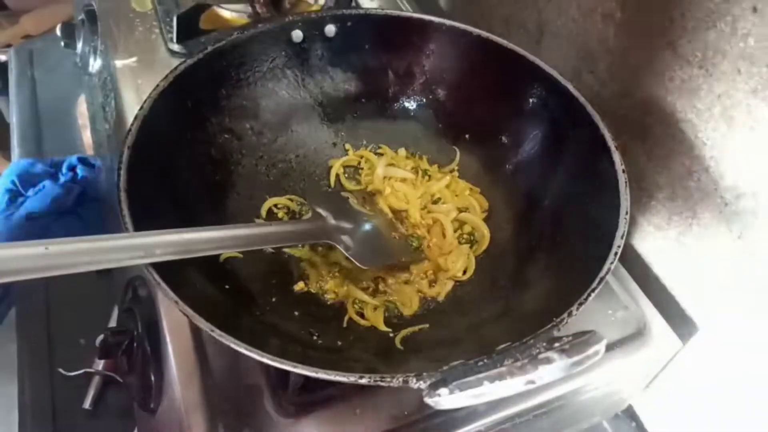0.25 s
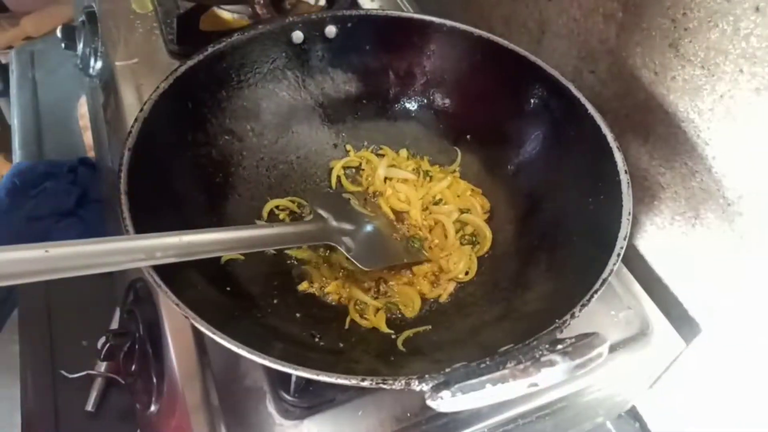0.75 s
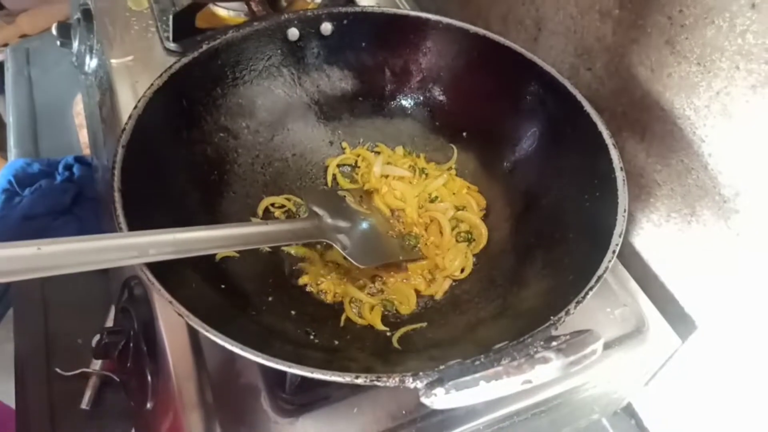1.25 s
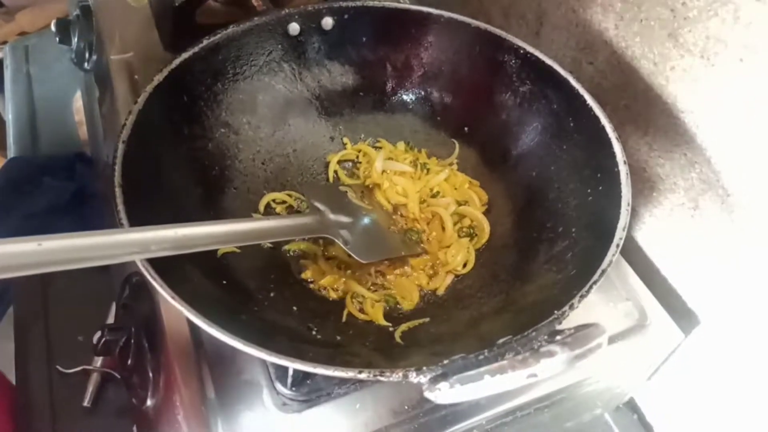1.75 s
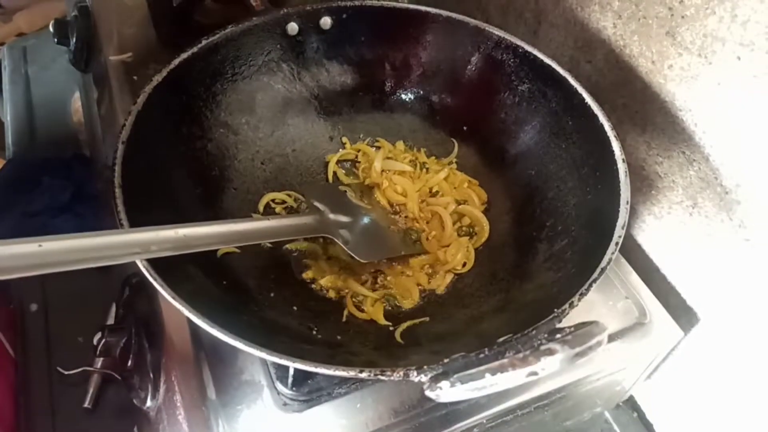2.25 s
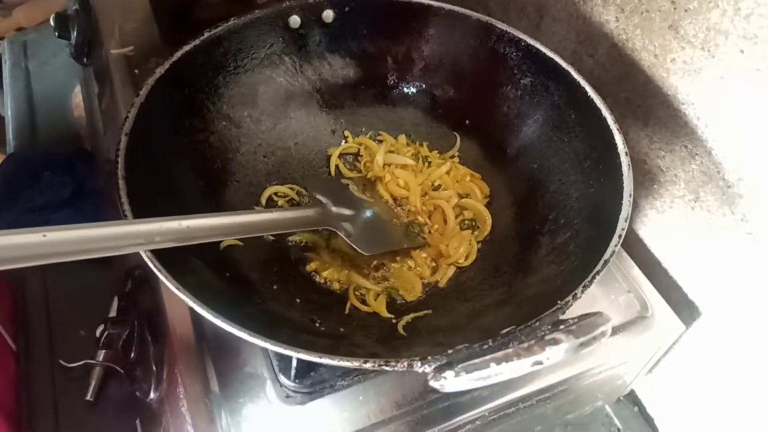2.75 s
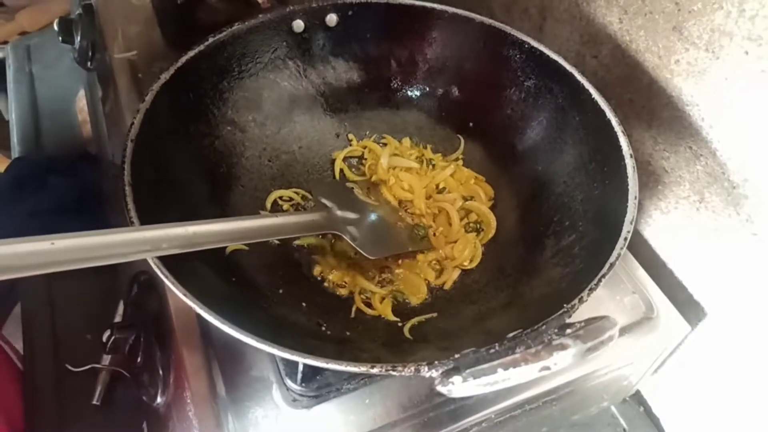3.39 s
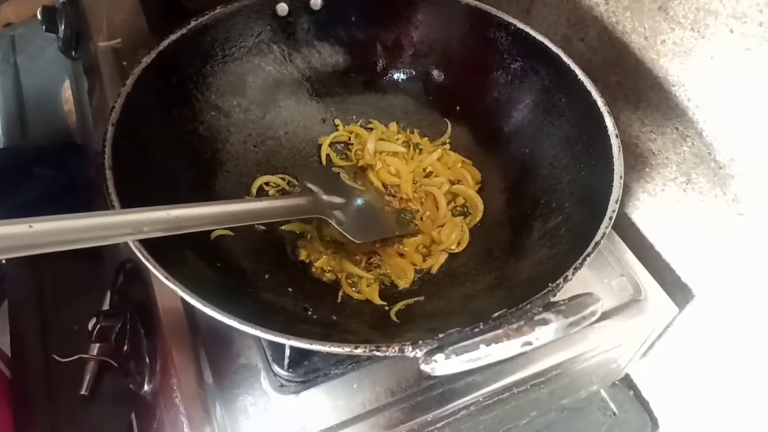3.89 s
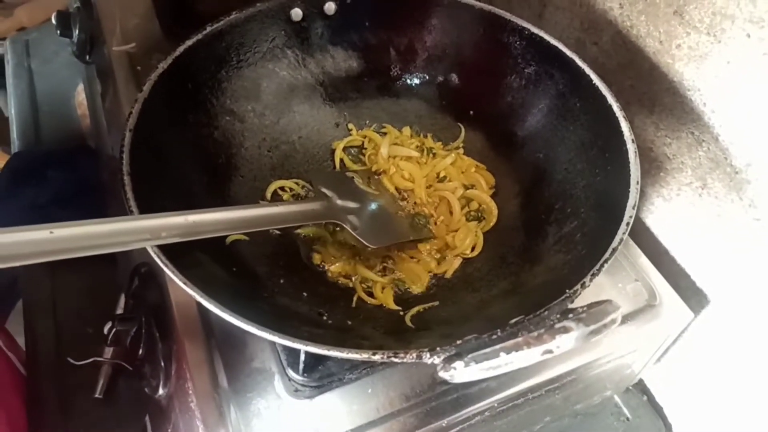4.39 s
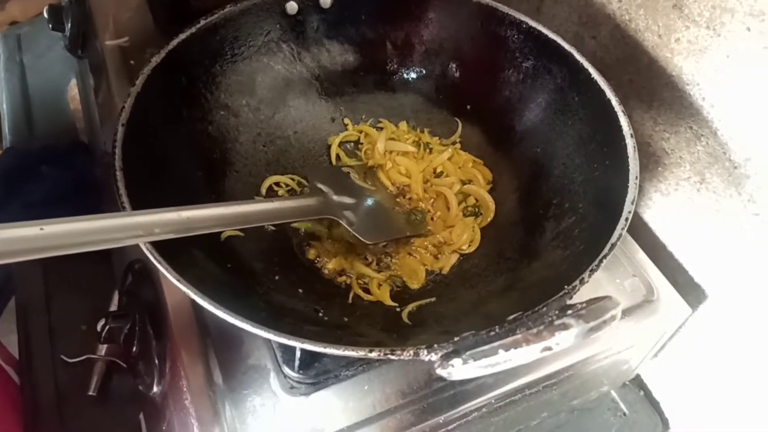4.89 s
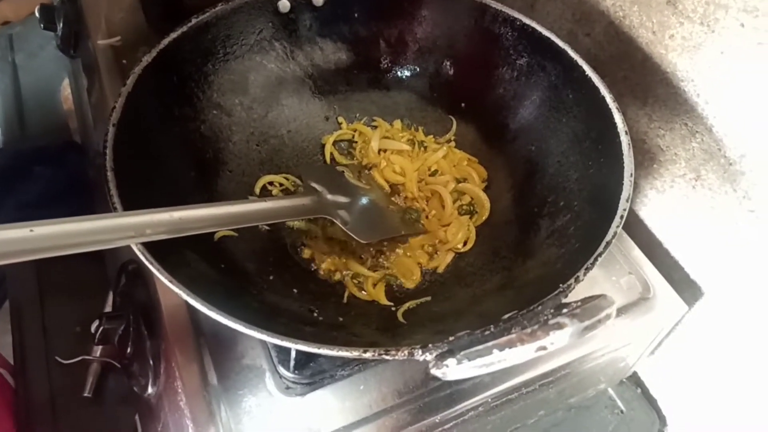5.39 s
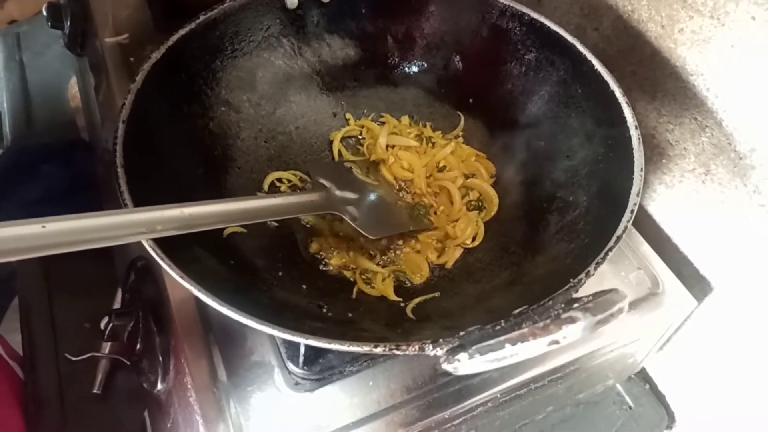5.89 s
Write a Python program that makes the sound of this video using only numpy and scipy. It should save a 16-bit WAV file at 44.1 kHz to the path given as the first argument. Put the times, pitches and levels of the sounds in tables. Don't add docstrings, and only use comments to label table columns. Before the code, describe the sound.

A steady, fine-grained sizzle of onions frying in oil runs throughout about six seconds, steam hiss mixed with tiny bursting bubbles, above a low burner and room rumble and a faint wavering fan hum. Around 0.1 s handling swells the rumble briefly, with a gritty steel click and small fat spits; soft dull spatula knocks follow at 0.3-0.4 s, and sharp spits at 0.5, 0.6 and, loudest, 0.83 s. At 1.05-1.18 s the spatula skids, lands hard with a dull mid-pitched metallic clank and bounces two or three times, dying fast. Light touches and tiny crackles come near 2 s, a dry click at 2.3, soft taps around 3, 3.9 and 4.1, a spit near 4.5. Bright blade ticks with short pan rings sound at 4.8, 5.1 and 5.9 s, a fainter one at 5.5. Close phone microphone, mono-like, with softened treble.

```python
import sys
import numpy as np
from scipy import signal
from scipy.fft import rfft, irfft
from scipy.io import wavfile
from scipy.ndimage import uniform_filter1d, minimum_filter1d

SR = 44100
rng = np.random.default_rng(int(sys.argv[2]) if len(sys.argv) > 2 else 0)


def nominal_scale(level):
    x = np.asarray(level, float) / 20
    return 10 ** x


def persist_wave(psi):
    counts = np.round(np.clip(psi, -1, 1) * 32767).astype(np.int16)
    wavfile.write(sys.argv[1], SR, np.atleast_2d(counts).T)


N = 270721


def evened(x):
    return x / np.sqrt(np.mean(x ** 2) + 1e-20)


def read(points, hz):
    f, value = np.transpose(points)
    return np.interp(np.log(hz + 1), np.log(f + 1), value)


def colour(x, points):
    hz = np.fft.rfftfreq(x.shape[-1], 1 / SR)
    return irfft(rfft(x) * nominal_scale(read(points, hz)), x.shape[-1])


def band(x, lo_hz, hi_hz):
    return signal.sosfilt(signal.butter(2, [lo_hz, hi_hz], "bandpass", fs=SR, output="sos"), x)


def add(mix, s, sound):
    part = mix[round(s * SR):][:len(sound)]
    part += sound[:len(part)]


# time in seconds, change in dB.
STIR = [
    (0.0, -5),
    (.12, 11),
    (.24, 2.5),
    (.8, .3),
    (1.25, 2),
    (1.4, 0.7),
    (3.88, -0.4),
    (4.02, 0.5),
    (4.99, -1.5),
    (6.14, -0.1),
]


def level(base_db, share):
    s, db = np.transpose(STIR)
    return nominal_scale(base_db + share * np.interp(np.arange(N) / SR, s, db))


def patchy(points, patchy_db, flicker_db):
    frames = N // 128 + 5
    a, b, patches = rng.standard_normal((frames, 257, 3)).T
    patches = uniform_filter1d(patches, size=9, axis=0)
    patches = evened(uniform_filter1d(patches, size=16, axis=1))
    flicker = evened(uniform_filter1d(rng.standard_normal(frames), size=4))
    z = (a + 1j * b) * nominal_scale(patchy_db * patches + flicker_db * flicker)
    noise = signal.istft(z, nperseg=512, noverlap=384)[1][:N]
    return colour(noise, points)


# pitch in Hz, level in dB per Hz.
FIZZ = [(300, -9), (900, -10), (1300, -1.5), (2500, -5), (3400, -2.5), (16000, 1.5)]


def sizzle():
    hiss = evened(patchy(FIZZ, patchy_db=1.0, flicker_db=0.48))
    bubbles_per_s = 1400
    size = nominal_scale(2.5 * np.minimum(rng.exponential(1, N), 5))
    size = size * (rng.random(N) < bubbles_per_s / SR)
    kind = rng.integers(0, 16, size=N)
    t = np.arange(200) / SR
    pops = np.zeros(N)
    for k, hz in enumerate(np.geomspace(1200, 14000, num=16)):
        grain = np.sin(2 * np.pi * hz * t) * np.exp(-t * hz / 2.4)
        grain = grain / np.linalg.norm(grain) * np.sqrt(hz)
        pops += signal.oaconvolve(size * (kind == k), grain)[:N]
    fizz = hiss + nominal_scale(-15.0) * evened(colour(pops, FIZZ))
    return level(base_db=-46, share=0.21) * fizz * nominal_scale(6.5)


# pitch in Hz, level in dB per Hz.
KITCHEN = [(18, -73), (30, -44), (64, -4.5), (118, -7), (151, -5.5), (202, -8), (231, -5.5), (270, -9.5),
           (445, -10.5), (520, -12.5), (561, -12.5), (874, -12.5), (1140, -18), (1650, -14.5),
           (3000, -16.5), (3900, -72), (6600, -120)]
# pitch in Hz, width in Hz, level in dB.
HUM = [(81.3, 4.7, -66), (124.9, 16.7, -58.5), (191.7, 26, -65)]


def kitchen():
    rumble = evened(patchy(KITCHEN, patchy_db=1.86, flicker_db=0.74))
    drone = np.zeros(N)
    for hz, width, db in HUM:
        note = band(rng.standard_normal(N), hz - width / 2, hz + width / 2)
        drone += nominal_scale(db) * evened(note)
    return level(base_db=-54, share=0.98) * rumble + drone


def burst(db, hz, cycles, snap_db, tail_db):
    t = np.arange(6000) / SR
    noise = rng.standard_normal(len(t))
    u = t * hz / max(cycles, .5) * 3
    pop = np.e * u * np.exp(-u) * np.sin(2 * np.pi * hz * t)
    snap = evened(band(noise, 1500, 16000)) * np.minimum(t / .0003, 1)
    pop += nominal_scale(snap_db - 60 * t / .008) * snap
    pop += 0.062 * np.roll(pop, 66)
    backwards = noise[::-1]
    wide = evened(band(backwards, .6 * hz, min(1.6 * hz, 15000))) + .35 * backwards
    fade = nominal_scale(-60 * t / 0.02) + nominal_scale(-11.0 - 60 * t / 0.2)
    tail = nominal_scale(tail_db - 0.5) * wide * fade
    return nominal_scale(db) * (pop + tail * (1 - np.exp(-t / 0.00036)))


# start in seconds, peak in dB, bubble pitch in Hz, ringing time in cycles.
SPITS = [(.0805, -25.5, 3600, 2.1), (.1455, -27, 6450, 4.1), (.466, -30.5, 6700, 13),
         (.466, -24.5, 3620, 1.6), (.632, -25, 3100, 0.84), (.632, -20, 13500, 4), (.8321, -8, 14100, 3.7),
         (.832, -10.5, 7460, 3), (.832, -29, 3900, 3.7), (.8442, -33, 4300, 2.6), (.8654, -29, 6800, 4.4),
         (.872, -38, 6900, 4), (1.2093, -35, 2100, 4.2), (1.9265, -34.5, 3740, 6.5), (1.9365, -34, 7040, 3),
         (1.9605, -33.5, 3770, 7.8), (1.982, -41, 3830, 15), (2.168, -36.5, 6020, 19),
         (3.413, -38, 3550, 16), (3.43, -43, 3930, 24), (4.429, -39, 4260, 8), (4.471, -30.5, 2540, 3.5),
         (4.472, -31, 7000, 6.3), (4.486, -40, 2600, 5), (4.5685, -43, 6460, 5), (4.74, -40, 4460, 6),
         (4.884, -38, 2500, 3.2), (5.963, -39, 6500, 3.7)]


def spits():
    out = np.zeros(N)
    for s, db, hz, cycles in SPITS:
        tail_db = -10.5 - 0.24 * (db + 33)
        add(out, s, burst(db, hz, cycles, snap_db=-13, tail_db=tail_db))
    return out


# start in seconds, #
# peak in dB, pitch in Hz, ringing time in cycles, scattered tail in dB against the peak.
CLICKS = [(.0985, -36, 260, 0.94, -20.5), (.1136, -14.5, 887, 1.9, -19), (.1136, -18.5, 2400, 1.8, -13),
          (0.173, -38, 239, 1.4, -12), (0.1167, -26.5, 1490, 3.5, -2), (0.333, -40, 2100, 8, -2),
          (0.3406, -37.5, 2030, 8.9, 4), (.353, -43.5, 4540, 7.4, 4), (.357, -39, 2140, 7.2, -5),
          (1.0563, -28.5, 1700, 2.5, -18), (1.073, -26.5, 1530, 3.4, -12), (1.0849, -17, 690, 1.6, -17),
          (1.0862, -21.5, 1880, 2.4, -4.5), (1.0862, -26.5, 6900, 3, -5.5), (1.096, -31, 6900, 3.6, -3),
          (1.428, -35, 2320, 4.4, -6), (2.3248, -25.5, 2620, 1.3, -16), (2.982, -36, 1360, 2.2, -6),
          (3.908, -31, 4600, 4.4, -7.5), (5.078, -32, 1160, 3.3, -3.5), (5.0785, -35, 4120, 4.5, -4),
          (5.088, -31, 7100, 5, -10), (5.8826, -35, 4150, 10.5, -1.5)]


def clicks():
    out = np.zeros(N)
    for s, db, hz, cycles, tail_db in CLICKS:
        add(out, s, burst(db, hz, cycles, snap_db=-6.5, tail_db=tail_db))
    return out


# pitch in Hz, level in dB against the main ring, time to fall 60 dB in seconds.
PAN = [(178, -11, 0.091), (369.6, -20, 0.23), (459, -10.5, 0.12), (596, -11.5, 0.084), (706, -17, 0.14),
       (1490, -19, 0.088), (1800, -36, 0.13)]


def knock(db, hz, t60, thud_db, rise):
    t = np.arange(SR // 3) / SR
    noise = rng.standard_normal(len(t))
    ring = nominal_scale(-60 * t / max(t60, .02)) * np.sin(2 * np.pi * hz * t)
    for (pan_hz, pan_db, pan_t60), phase in zip(PAN, 6 * noise):
        fade = nominal_scale(pan_db + 0.33 * thud_db - 1.5 - 60 * t / pan_t60)
        ring += fade * np.sin(2 * np.pi * pan_hz * t + phase)
    thud = evened(band(band(noise, 333, 860), 333, 840))
    thud = thud * nominal_scale(thud_db - 8.5 - 60 * t / 0.07)
    swell = 1 - np.exp(-t / max(rise, .0002))
    return nominal_scale(db) * (ring * swell + thud * (1 - np.exp(-t / 0.00045)))


# start in seconds, peak in dB, ring pitch in Hz,
# dull thud in dB against the ring.
TAPS = [(.1185, -40, 770, 1), (.331, -36, 840, -1), (.3405, -28.5, 820, 3.5), (.354, -33.5, 608, 7.5),
        (.371, -39.5, 656, 8.5), (.405, -48, 613, 8), (1.0846, -11.5, 523, -6.5), (1.424, -40.5, 544, 1),
        (1.961, -38, 472, 4), (2.0855, -39, 814, -9), (2.322, -41.5, 675, 6), (2.36, -46, 550, 5),
        (3.183, -43, 470, 2), (3.884, -33, 545, -6), (3.884, -32.5, 846, 2), (3.899, -37.5, 800, 0),
        (3.93, -40, 880, 4), (4.467, -49.5, 550, 10), (4.8205, -25.5, 558, -38), (5.042, -37.5, 865, 4),
        (5.077, -39.5, 532, 8), (5.121, -35.5, 890, -9), (5.544, -41, 560, 4.5), (5.8801, -28.5, 606, -8),
        (5.8945, -30, 575, -6)]


def taps():
    out = np.zeros(N)
    for s, db, hz, thud_db in TAPS:
        add(out, s, knock(db, hz, 21.2 / hz, thud_db, rise=0.37 / hz))
    return out


# start in seconds, peak in dB, ring pitch in Hz,
# time to fall 60 dB in seconds.
RINGS = [(.1185, -42, 714, 0.17), (.598, -52, 692, .3), (1.701, -43, 466, 0.11), (1.739, -44.5, 443, .1),
         (1.939, -43.5, 486.6, 0.28), (1.982, -32, 494, 0.065), (1.996, -38, 460, 0.062),
         (2.027, -47, 507, .15), (2.875, -48, 493, 0.12), (2.982, -35.5, 464, 0.097),
         (3.163, -45.5, 443, .09), (3.34, -54, 535, 0.54), (3.895, -34, 538.6, 0.2),
         (3.919, -37, 549, 0.075), (4.117, -33.5, 442, .19), (4.1303, -31.5, 457, 0.061),
         (4.468, -49.5, 536, 0.3), (4.8215, -43, 541, .15), (4.836, -28.5, 527.5, .15),
         (5.052, -39.5, 527, 0.19), (5.092, -39, 524.5, 0.29), (5.133, -39, 527, 0.14),
         (5.543, -37, 531, 0.22), (5.904, -34.5, 531, 0.15)]


def rings():
    out = np.zeros(N)
    for s, db, hz, t60 in RINGS:
        add(out, s, knock(db, hz, t60, thud_db=-24, rise=0.0019))
    return out


# start in seconds, peak in dB, ring pitch in Hz,
# time to fall 60 dB in seconds, thud in dB against the ring.
SLIP = [
    (1.0553, -30.5, 327, 0.27, 4),
    (1.0706, -18, 349, 0.093, -9),
    (1.079, -23, 397.6, 0.22, -1),
    (1.0965, -8, 526, 0.097, -23.5),
    (1.124, -25.5, 505, 0.25, -1),
    (1.149, -23.5, 509.5, 0.14, -12),
    (1.176, -35, 518, 0.13, -12),
]


def slip():
    out = np.zeros(N)
    for s, db, hz, t60, thud_db in SLIP:
        add(out, s, knock(db, hz, t60, thud_db, rise=0.0029))
    return out


# start in seconds, peak in dB.
TICKS = [
    (4.8203, -33),
    (5.0785, -34),
    (5.544, -42),
    (5.8813, -34),
]
# pitch in Hz, level in dB against the tick,
# ringing time in cycles, tail in dB.
BLADE = [(4150, -1.5, 6, -1.5), (9350, 9.5, 7.5, -5.5)]


def ticks():
    out = np.zeros(N)
    for s, db in TICKS:
        for hz, note_db, cycles, tail_db in BLADE:
            add(out, s, burst(db + note_db, hz, cycles, snap_db=-10, tail_db=tail_db))
    return out


def scene():
    steady = sizzle() + kitchen()
    sharp = spits() + clicks() + ticks()
    dull = taps() + rings() + slip()
    return np.tile(steady + sharp + dull, (2, 1))


# pitch in Hz, level in dB.
BODY = [(30, -11), (60, -1), (980, 1.5), (1090, -3.5), (1220, -1), (1400, 0.5), (1560, -3.5), (1780, 1.5),
        (1920, -2.5), (2080, 1.5), (2200, -2.5), (2320, -0.5), (2900, -1.5), (3400, 0.5)]
# pitch in Hz, level in dB.
PHONE = [(3400, -6.5), (4720, -2), (4790, -11.5), (6080, -9.5), (6150, -2), (7650, -4), (7720, -11),
         (8510, -10), (8580, -18.5), (11560, -38), (11640, -17.5), (15470, -20), (15560, -70)]


def phone(x):
    return colour(colour(x, BODY), PHONE) * nominal_scale(4)


# low edge in Hz, high edge in Hz, share of the time.
HOLES = [(9850, 10400, .12), (11100, 11550, .2), (10500, 10900, .08)]


def dropouts(x):
    t = np.arange(N) / 1024
    power = x ** 2
    quiet = uniform_filter1d(power, size=1024) < 2 * np.median(power) / .45
    for (lo_hz, hi_hz, share), dice in zip(HOLES, rng.random((len(HOLES), N // 1024 + 3))):
        missing = minimum_filter1d(dice, size=2) < share / 2
        gate = np.interp(t, np.arange(len(dice)), missing) * quiet
        part = colour(x, [(lo_hz - 20, -80), (lo_hz, 0), (hi_hz, 0), (hi_hz + 20, -80)])
        x = x - uniform_filter1d(gate, size=300) * part
    return x


# middle in seconds, low edge in Hz, high edge in Hz, level in dB.
FILLS = [(1.605, 4100, 5300, -56), (2.51, 4100, 5300, -59), (2.77, 6900, 8400, -56),
         (2.93, 5700, 7000, -54), (4.205, 13800, 15300, -67), (4.39, 7600, 9000, -61),
         (4.72, 5700, 8400, -52), (5.23, 5700, 8400, -54), (5.25, 8300, 10400, -72),
         (5.465, 4100, 6400, -55)]


def fills():
    side = np.zeros(N)
    for s, lo_hz, hi_hz, db in FILLS:
        noise = rng.standard_normal(1800)
        puff = colour(noise, [(lo_hz - 30, -80), (lo_hz, 0), (hi_hz, 0), (hi_hz + 30, -80)])
        add(side, s - .02, nominal_scale(db + 1) * evened(puff) * np.hanning(1800) ** .5)
    return np.array([side, -side])


def roll_off(x):
    return signal.sosfilt(signal.butter(12, 16680, fs=SR, output="sos"), x)


def record(dry):
    mono = dropouts(phone(dry[0]))
    mix = mono + fills()
    return roll_off(mix)


dry = scene()
out = record(dry)
persist_wave(out)
```